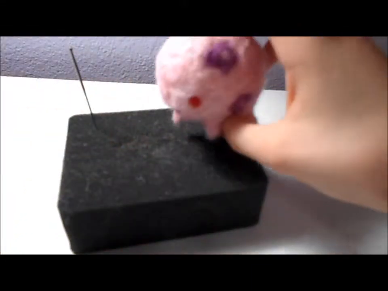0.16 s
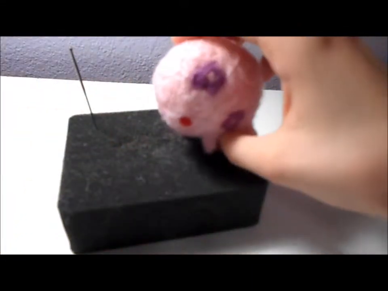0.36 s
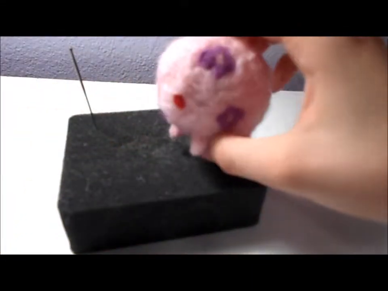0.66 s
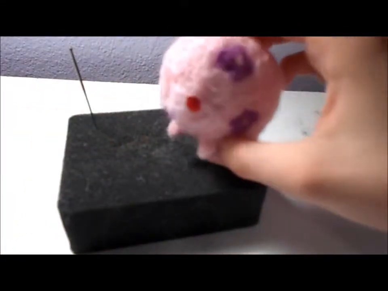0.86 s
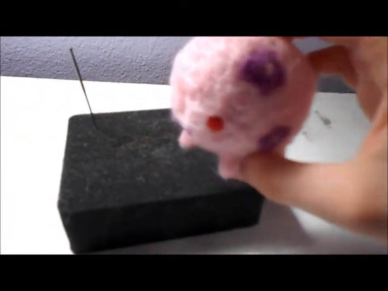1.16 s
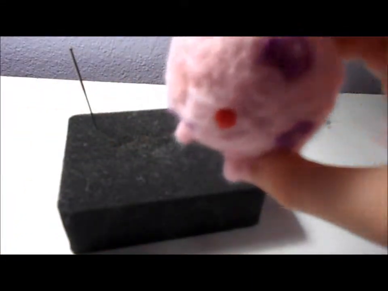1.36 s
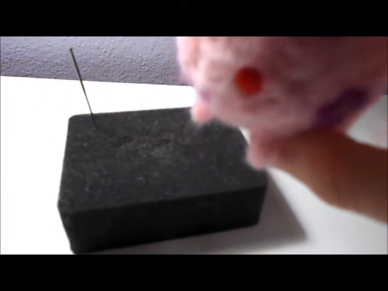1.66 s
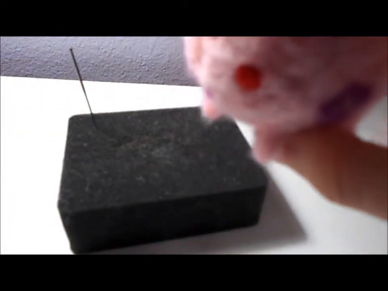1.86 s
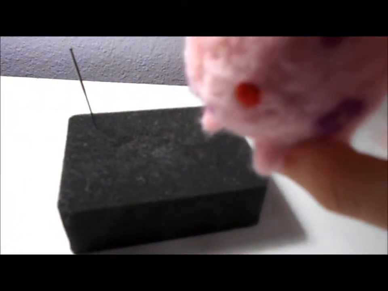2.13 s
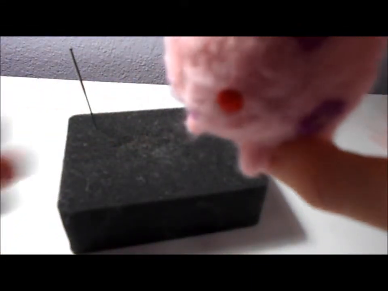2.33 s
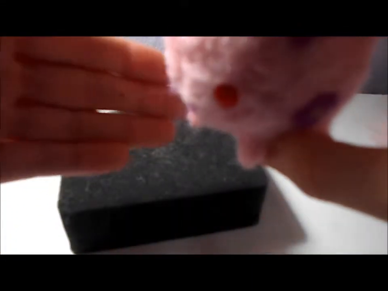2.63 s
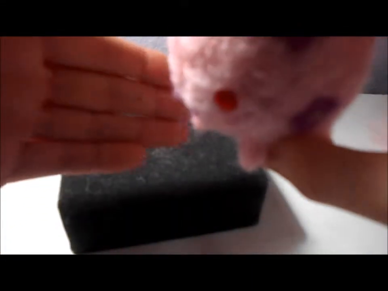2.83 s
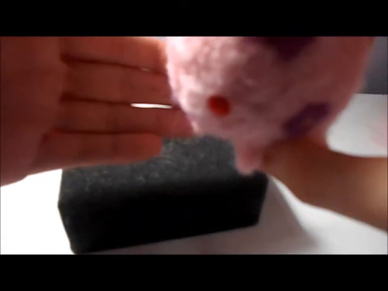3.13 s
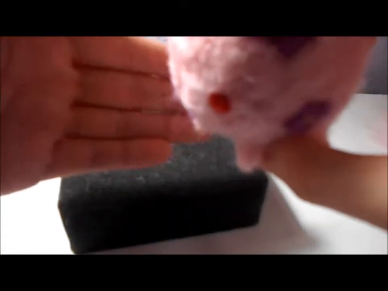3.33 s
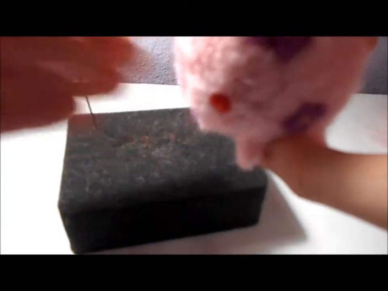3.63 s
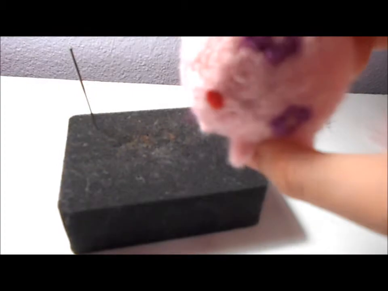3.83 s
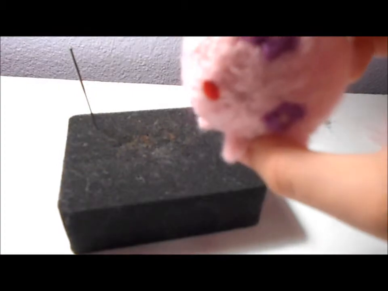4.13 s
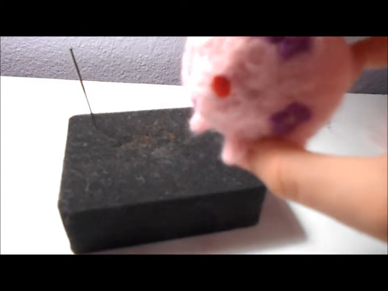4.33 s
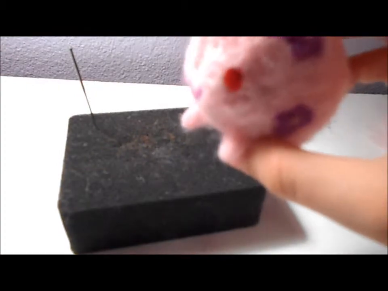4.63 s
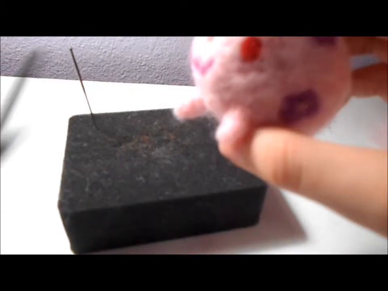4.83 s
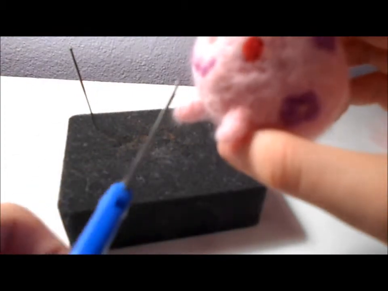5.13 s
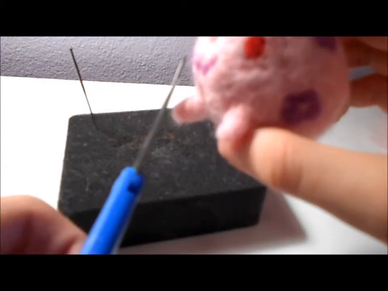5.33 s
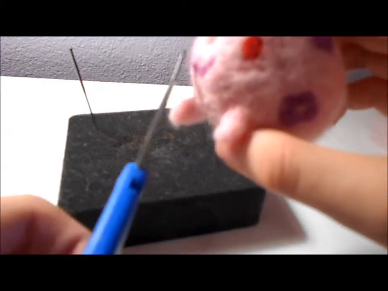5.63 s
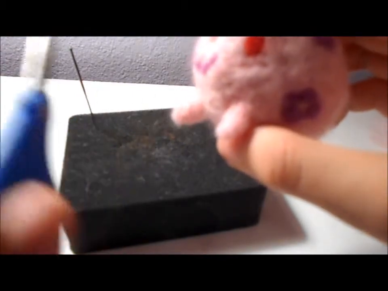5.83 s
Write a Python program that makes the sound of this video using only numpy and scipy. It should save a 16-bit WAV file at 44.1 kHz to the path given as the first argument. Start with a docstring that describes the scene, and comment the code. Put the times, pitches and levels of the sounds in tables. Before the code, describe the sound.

In a small, quiet room, skin drags and stutters softly over wool while light knocks ring a desk top near the microphone. One sharp clack of a hard tool follows, then only faint hiss and hum. A cluster of bumps and rubbing comes as small scissors are picked up. They snip twice quickly, and once more after a short gap.

```python
"""A felted wool figure is turned in the hand, close to a small microphone on a desk. First the fingers
rub and judder in stick-slip, and knocks ring the desk top. At 2 s a hard tool clacks down and chatters.
From 4.2 s come more knocks and rubs as small scissors are picked up; from 4.7 s their edges grate
through three short strokes at the loose fibres. Faint hum and hiss fill the small room throughout."""
import sys
import numpy as np
from scipy import signal
from scipy.fft import rfft, irfft
from scipy.io import wavfile

SR = 44100
rng = np.random.default_rng(int(sys.argv[2]) if len(sys.argv) > 2 else 0)


def store_pcm(level_fs):
    """Save levels as 16-bit WAV."""
    pcm = np.round(np.clip(level_fs, -1, 1) * 32767).astype(np.int16)
    wavfile.write(sys.argv[1], SR, np.atleast_2d(pcm).T)


N = 263718
TIME_S = np.arange(N) / SR
HIT_S = TIME_S[:SR // 4]

# desk top modes: f/Hz, level/dB, t60/s
DESK_MODES = [(191.7, -4, 0.18), (291, -9.5, 0.14), (324, -2, 0.094), (338.7, -3.5, 0.13), (391, -2.5, .08),
              (466, 0, 0.09), (548.5, -0.5, .07), (651.7, -6.5, 0.1), (815, -17, .06), (976, -6.5, 0.084),
              (1107, -15.5, .07), (1281, -8, 0.11), (1560, -29, 0.096), (1740, -24.5, .11)]
# crack of the dense upper modes: f/Hz, level/dB
CRACK_SPECTRUM = [(250, -29.5), (600, 1), (820, -4.5), (1200, 3.5), (1800, 0), (2400, -7), (3300, -2.5),
                  (5000, -11), (7000, -12), (10500, -18)]
# blows on the desk: t/s, thud level/dB, contact corner/Hz, low cut/Hz
DESK_KNOCKS = [(.133, -43, 4250, 226), (0.1577, -48, 2800, 218), (0.2628, -33.5, 3000, 195),
               (.988, -55.5, 1300, 240), (1.695, -56.5, 1200, 265), (1.9744, -47.5, 1100, 290),
               (1.9955, -29.5, 5400, 165), (2.0014, -26.5, 3002, 165), (4.177, -55, 2400, 240),
               (4.2614, -38, 2520, 320), (4.376, -47, 500, 170), (4.403, -44, 600, 170),
               (4.409, -40.5, 3230, 200), (4.414, -34, 1190, 195), (4.4333, -32.5, 2500, 255.5),
               (4.5523, -37, 4400, 185)]


def knocks(crack_t60_s=.035, crack_db=-4, crack_db_per_octave=8.5, mid_contact_hz=3000):
    """Blows ring the desk; harder contact gives a brighter thud and a stronger crack."""
    out = np.zeros(N)
    desk = ring(DESK_MODES)
    for s, db, contact_hz, low_hz in DESK_KNOCKS:
        thud = cut(desk, low_hz, "high", order=4)
        thud = cut(thud, contact_hz / 2, "low")  # slow modes feel the whole push: an octave lower
        crack = colour(rng.standard_normal(len(HIT_S)), CRACK_SPECTRUM) * fade(HIT_S, crack_t60_s)
        crack = cut(cut(crack, contact_hz, "low"), low_hz, "high")
        hardness_db = crack_db_per_octave * np.log2(contact_hz / mid_contact_hz)
        add(out, s, blow(thud, db) + blow(crack, db + crack_db + hardness_db))
    return out


# hard tool modes: f/Hz, level/dB, t60 before scaling/s
TOOL_MODES = [(2694, -16.5, 0.057), (2850, -4.5, 0.052), (3155, -3, 0.05544), (3130, -10, 0.044),
              (3530, 2.5, 0.06), (3540, 2.5, 0.046), (3530, 0, 0.027), (3976, -4, 0.062), (3850, -1, 0.021),
              (4434, -5, 0.077), (4820, -2.5, 0.018), (5082, -5.5, .045), (5500, -13, 0.028),
              (6095, -16, 0.031), (6615, -8.5, 0.022), (7440, -18.5, 0.03)]
# tool contacts: t/s, level/dB
TOOL_BOUNCES = [(1.995, -24.5), (1.997, -25.5), (2.001, -30.5), (2.0032, -29)]


def clack(t60_scale=0.35, snap_db=-1, snap_t60_s=0.00844):
    """The hard tool bounces within 10 ms, each contact a snap and a short ring."""
    out = np.zeros(N)
    tool = ring(TOOL_MODES, t60_scale, thin=True)
    for s, db in TOOL_BOUNCES:
        snap = band(burst(snap_t60_s), hz=3650, width_hz=1900)
        snap = cut(snap, 6720, "low", order=4)
        add(out, s, blow(tool, db) + blow(snap, db + snap_db))
    return out


# wool fibre hiss: f/Hz, level/dB
FIBRE_SPECTRUM = [(500, -6.5), (1200, -0.5), (2300, -1.5), (5000, -2), (7000, -8.5), (10500, -12.5)]
# rustle of the turning figure: centre t/s, length/s, body level/dB, hiss level/dB
TURN_RUSTLE = (0.4, 4, -71.5, -69.5)
# skin on wool: centre t/s, length/s, level/dB, brightness/Hz
FINGER_RUBS = [(.02, .05, -74, 3800), (0.186, 0.11, -56.5, 1390), (0.352, 0.038, -57, 1500),
               (0.417, 0.3, -64.5, 1100), (0.547, 0.051, -56, 1300), (0.685, 0.096, -59.5, 2500),
               (0.853, 0.093, -59.5, 550), (1.305, 0.038, -68, 400), (1.702, 0.051, -53.5, 550),
               (1.989, 0.063, -45, 400), (2.16, 0.025, -54, 350), (4.185, 0.084, -49, 450),
               (4.494, 0.063, -34, 1410), (4.534, 0.036, -38, 1210), (4.591, 0.079, -54, 1880)]


def rubbing(t60_scale=.45, hiss_at_1khz_db=-38, hiss_db_per_db=0.53, hiss_db_per_octave=5.5):
    """Dragging skin shakes the damped desk; the wool hisses more on stronger, brighter rubs."""
    body = through(slips(per_s=1800, spread_db=3), ring(DESK_MODES, t60_scale))
    body = cut(body, 185, "high", order=4)
    fibres = colour(slips(per_s=5000, spread_db=4), FIBRE_SPECTRUM)
    s, length_s, body_db, hiss_db = TURN_RUSTLE
    rustle = undb(body_db) * unit(cut(body, 820, "low")) + undb(hiss_db) * fibres
    out = swell(s, length_s) * rustle
    for s, length_s, db, bright_hz in FINGER_RUBS:
        push = swell(s, length_s)
        rumble = cut(body, bright_hz, "low")
        rumble /= np.sqrt(np.average(rumble ** 2, weights=push ** 2))
        hiss_db = hiss_at_1khz_db + hiss_db_per_db * db + hiss_db_per_octave * np.log2(bright_hz / 1000)
        out += push * (undb(db) * rumble + undb(hiss_db) * fibres)
    return out


# fingertip drags: centre t/s, length/s, level/dB
FINGER_DRAGS = [(0.195, 0.025, -43), (.226, .044, -45), (0.309, 0.046, -43.5), (0.366, 0.064, -42.5),
                (.43, 0.11, -56.5), (.554, 0.074, -54.5)]


def judder(slip_hz=295, jitter=0.043, overtone_db=-15):
    """Near-regular stick-slip of a fingertip: a low, unsteady groan with weak overtones."""
    wobble = 1 + jitter * drift(top_hz=67)
    phase = 2 * np.pi * np.cumsum(slip_hz * wobble) / SR
    overtones = sum(np.sin(k * phase) / (k - 1) for k in range(2, 6))
    drag = sum(undb(db) * swell(s, length_s) for s, length_s, db in FINGER_DRAGS)
    return drag * np.sqrt(2) * (np.sin(phase) + undb(overtone_db) * overtones)


# edge sliding on edge: f/Hz, level/dB
SHEAR_SPECTRUM = [(600, -17), (1300, 3), (1900, -0.5), (2600, 2), (3500, -0.5), (4800, 1), (5900, -2),
                  (6800, 2.5), (7800, -4), (9800, -11), (11000, -3)]
# blade modes: f/Hz, level/dB, t60/s
BLADE_MODES = [(1436, 8, 0.012), (2580, -9, 0.021), (3060, -9, 0.034), (4510, 1.5, 0.033),
               (5250, -14, 0.02), (5690, -4, 0.049), (6830, -5, 0.035), (7100, -12, .022), (8150, -21, .02),
               (9000, -1, 0.023), (8300, 5, 0.019), (9400, 5.5, 0.016), (9980, 10, 0.012)]
# strokes: start t/s, end t/s, end level/dB, swell/dB, low cut/Hz
SCISSOR_STROKES = [(4.706, 4.731, -51.5, 4.5, 1500), (4.8214, 4.8483, -37, 6, 2020),
                   (5.674, 5.734, -43.5, 14, 750)]


def scissor_strokes(ring_db=-7, grip_s=.005, release_t60_s=.014,
                    treble_hz=2500, treble_db_per_db=.7, flat_at_db=-44):
    """The edges grate and ring the blades, louder and brighter as they close."""
    out = np.zeros(N)
    grit = slips(per_s=9000, spread_db=4.9)
    blades = unit(through(grit, ring(BLADE_MODES, thin=True)))
    grating = colour(grit, SHEAR_SPECTRUM) + undb(ring_db) * blades
    for start_s, end_s, db, swell_db, low_hz in SCISSOR_STROKES:
        closed = np.clip((TIME_S - start_s) / (end_s - start_s), 0, 1)
        level_db = db - swell_db * (1 - closed)
        grip = np.clip((TIME_S - start_s) / grip_s, 0, 1)
        release = fade(np.maximum(TIME_S - end_s, 0), release_t60_s)
        rasp = unit(cut(grating, low_hz, "high", order=3))
        dull = cut(rasp, treble_hz, "low", order=1)
        treble = undb(treble_db_per_db * (level_db - flat_at_db)) * (rasp - dull)
        out += grip * release * undb(level_db) * (dull + treble)
    return out


# blade contacts: t/s, level/dB, f/Hz, width/Hz
BLADE_TICKS = [(4.8369, -38.5, 9000, 900), (4.847, -37, 8840, 555), (5.733, -57, 8000, 4900),
               (5.739, -43.5, 4900, 3300)]
# handle contact: t/s, level/dB, high cut/Hz, t60/s
HANDLE_STOP = (5.7418, -58, 220, .025)


def scissor_contacts():
    """The blades tick where they catch or stop; the handles meet once with a thump."""
    out = np.zeros(N)
    for s, db, hz, width_hz in BLADE_TICKS:
        tick = band(burst(t60_s=0.0095), hz, width_hz)
        add(out, s, blow(band(tick, hz, 2 * width_hz), db))
    s, db, top_hz, t60_s = HANDLE_STOP
    add(out, s, blow(cut(burst(t60_s), top_hz, "low"), db))
    return out


def room(x, early_db, late_db, early_t60_s=0.081, late_t60_s=0.25):
    """Adds bright reflections from desk and wall, then the short tail of a furnished room."""
    early = cut(cut(rng.standard_normal(len(HIT_S)), 7880, "low"), 700, "high")
    early *= fade(HIT_S, early_t60_s) * (HIT_S > .004)
    late = cut(rng.standard_normal(len(HIT_S)), 6000, "low")
    late *= fade(HIT_S, late_t60_s) * (HIT_S > .01)
    response = undb(early_db) * early / np.linalg.norm(early) + undb(late_db) * late / np.linalg.norm(late)
    return x + through(x, response)


# rumble and hiss density: f/Hz, relative level/dB
FLOOR_SPECTRUM = [(12, -28.5), (20, 3.5), (164, -6), (299, -8), (349, -8), (516, -11.5), (5090, -21.5),
                  (6100, -20.5), (10000, -23), (13000, -40.5), (22000, -120)]
# mains hum: f/Hz, level/dB
HUM_TONES = [(60, -75.5), (360, -82.5)]


def background(floor_db=-64.5, waver_db=-0.64, whine_db=-87):
    """Room rumble and microphone hiss, mains hum and a thin high whine."""
    air = colour(rng.standard_normal(N), FLOOR_SPECTRUM)
    air *= undb(floor_db + waver_db * drift(top_hz=4.5))
    hum = sum(undb(db) * np.sqrt(2) * np.sin(2 * np.pi * hz * TIME_S) for hz, db in HUM_TONES)
    whine = unit(band(rng.standard_normal(N), hz=6130, width_hz=297))
    return air + hum + undb(whine_db) * whine


def undb(db):
    """Decibels to gain."""
    return 10 ** (np.asarray(db) / 20)


def unit(x):
    """Scale to rms 1."""
    return x / np.sqrt(np.mean(x ** 2))


def blow(x, db):
    """Scale a hit so its energy, spread over 20 ms, has this level."""
    return x * undb(db) / np.sqrt(np.sum(x ** 2) / (.02 * SR))


def fade(t, t60_s):
    """Exponential decay."""
    return np.exp(-np.log(1000) * t / t60_s)


def cut(x, hz, kind, order=2):
    """Butterworth low-pass or high-pass."""
    return signal.sosfilt(signal.butter(order, hz, kind, fs=SR, output="sos"), x)


def band(x, hz, width_hz):
    """One resonance."""
    return signal.lfilter(*signal.iirpeak(hz, hz / width_hz, fs=SR), x)


def colour(x, points):
    """Shape the spectrum by (f/Hz, level/dB) points; rms 1."""
    hz, db = np.transpose(points)
    bins_hz = np.maximum(np.fft.rfftfreq(len(x), 1 / SR), 1)
    gain = undb(np.interp(np.log(bins_hz), np.log(hz), db))
    return unit(irfft(rfft(x) * gain, len(x)))


def ring(modes, t60_scale=1, thin=False):
    """A struck body; in thin metal, neighbouring modes start in opposite directions."""
    return sum((-1) ** (k * thin) * undb(db) * np.sin(2 * np.pi * hz * HIT_S)
               * fade(HIT_S, t60_s * t60_scale) for k, (hz, db, t60_s) in enumerate(modes))


def through(x, response):
    """Play a sound through a body or a room."""
    return signal.fftconvolve(x, response)[:len(x)]


def burst(t60_s):
    """Decaying white noise."""
    return rng.standard_normal(len(HIT_S)) * fade(HIT_S, t60_s)


def drift(top_hz):
    """Slow random motion, rms 1."""
    return unit(cut(rng.standard_normal(N), top_hz, "low"))


def slips(per_s, spread_db):
    """Tiny random slips of uneven size, rms 1."""
    impulses = (rng.random(N) < per_s / SR) * rng.choice([-1, 1], N)
    return unit(impulses * undb(spread_db * rng.standard_normal(N)))


def swell(centre_s, length_s):
    """One smooth push of the hand, at half height a third of its length from the centre."""
    distance = np.abs(3 * (TIME_S - centre_s) / length_s)
    return 0.5 ** (np.minimum(distance, 10) ** 2)


def add(out, s, x):
    """Mix x in at time s."""
    i = int(s * SR)
    out[i:i + len(x)] += x[:N - i]


def scene():
    """Handling on the desk and the nearer scissors over the background, mono."""
    handling = room(knocks() + clack() + rubbing() + judder(), early_db=-18.5, late_db=-25.0)
    scissors = room(scissor_strokes() + scissor_contacts(), early_db=-26.0, late_db=-25.5)
    return (handling + scissors + background())[None]


def record(dry, mic_top_hz=10500, ceiling=0.43, output_top_hz=11100):
    """Narrow-band microphone; only the loudest peaks overload its input."""
    narrow = signal.sosfilt(signal.cheby1(14, .2, mic_top_hz, fs=SR, output="sos"), dry)
    rounded = narrow / (1 + (narrow / ceiling) ** 10) ** (1 / 10)
    return cut(rounded, output_top_hz, "low", order=5)


dry = scene()
out = record(dry)
store_pcm(out)
```